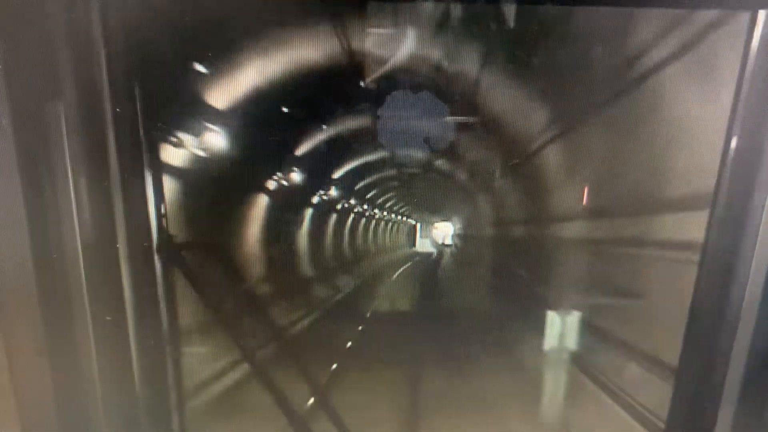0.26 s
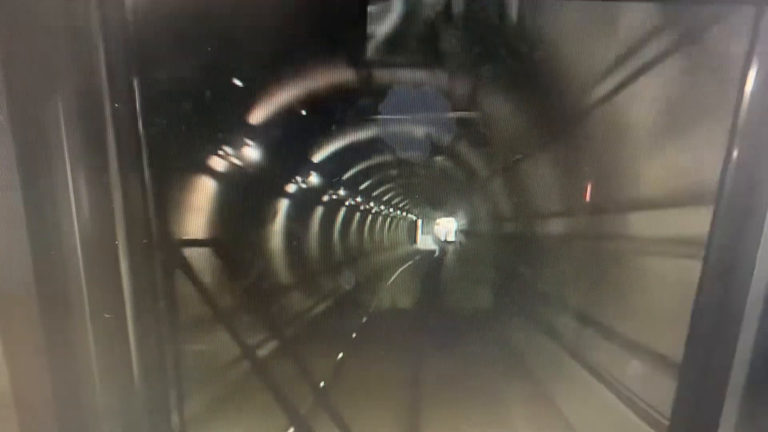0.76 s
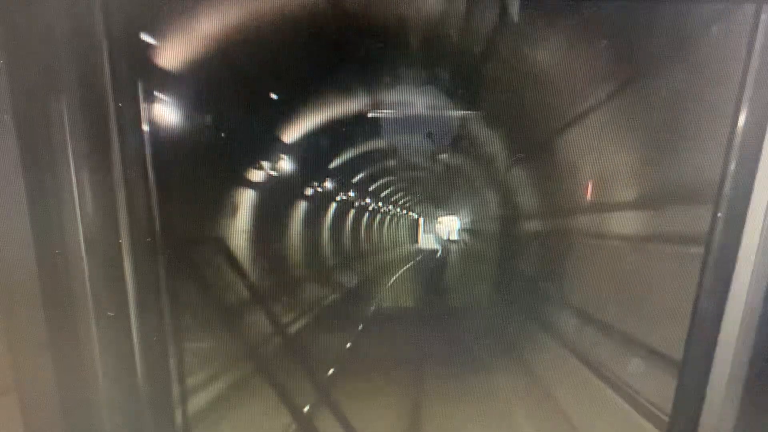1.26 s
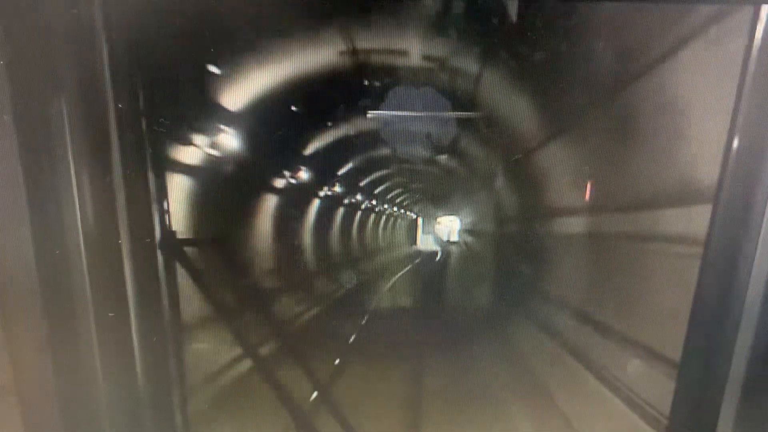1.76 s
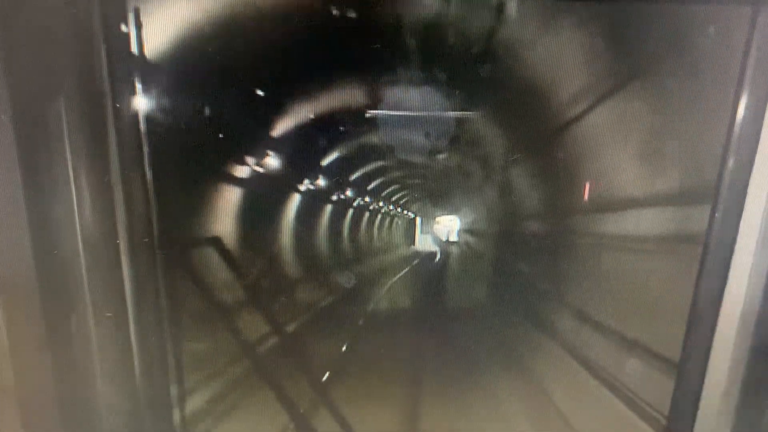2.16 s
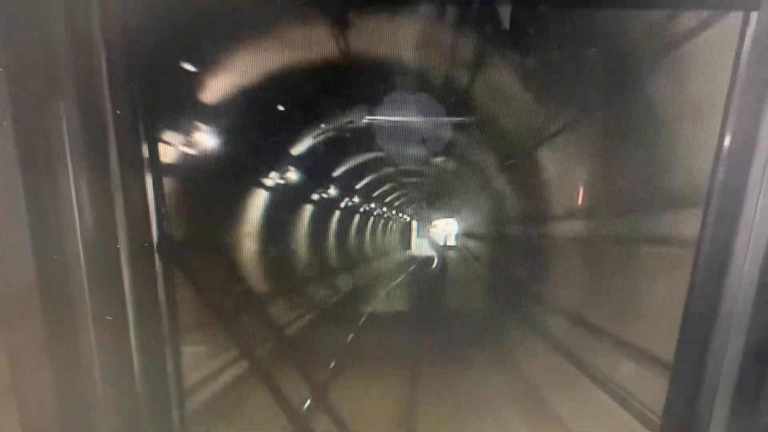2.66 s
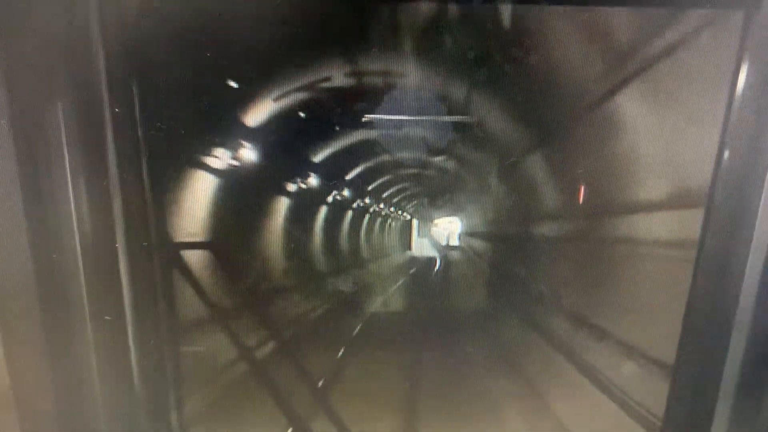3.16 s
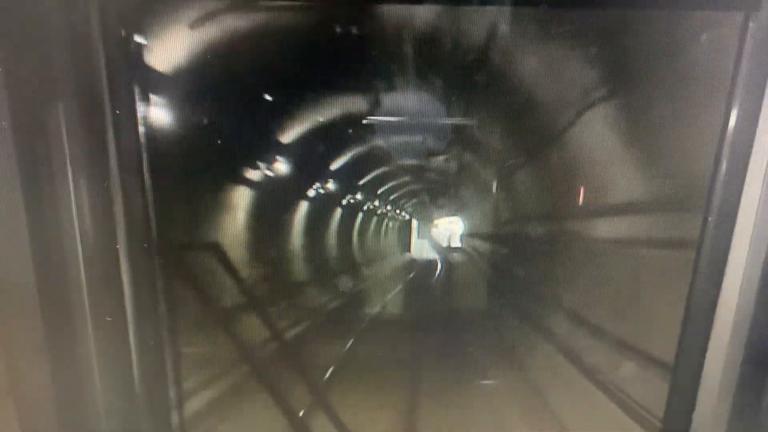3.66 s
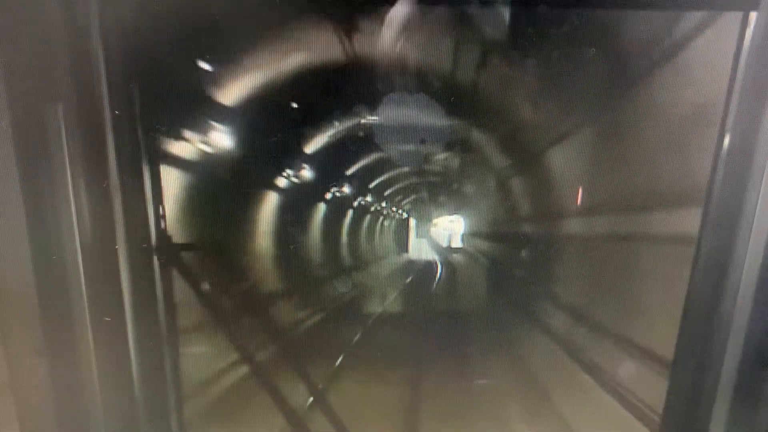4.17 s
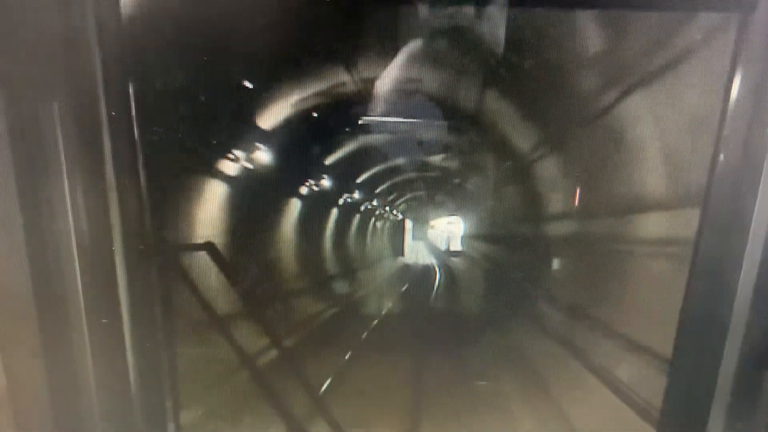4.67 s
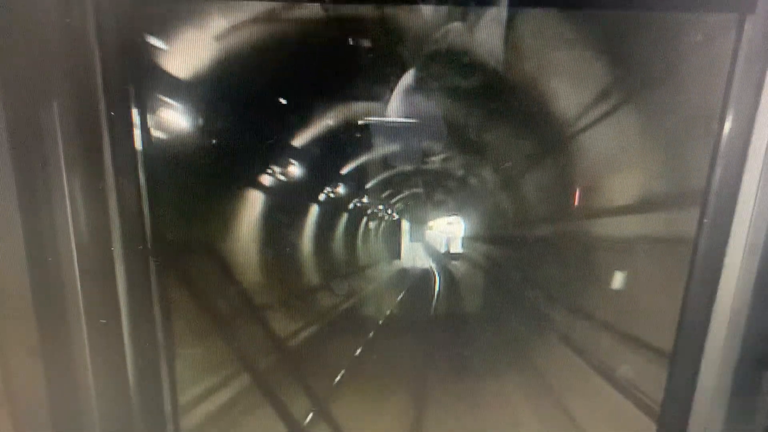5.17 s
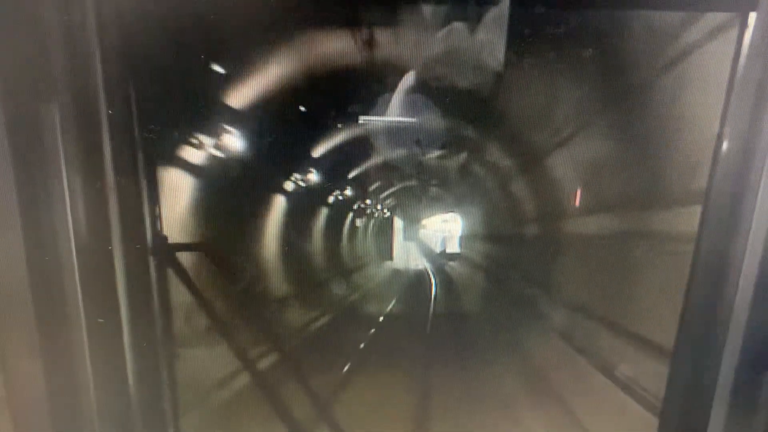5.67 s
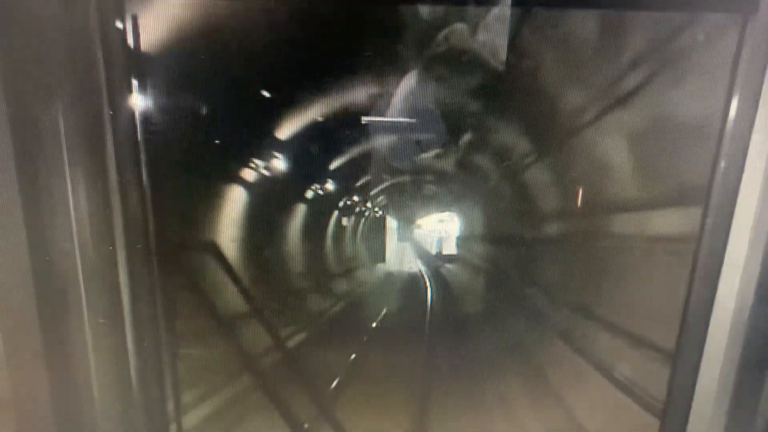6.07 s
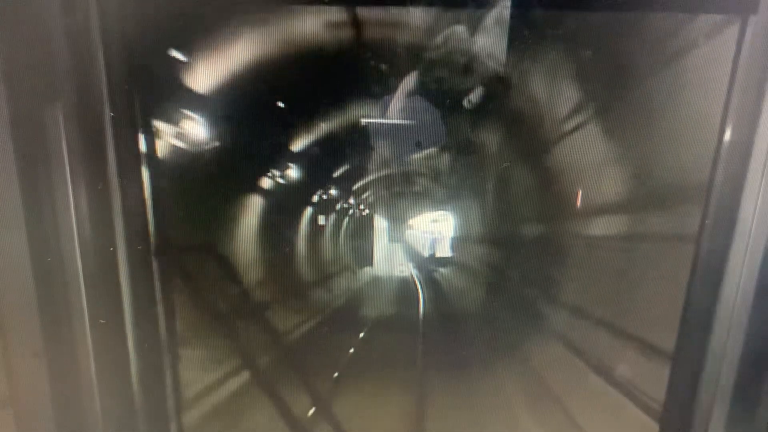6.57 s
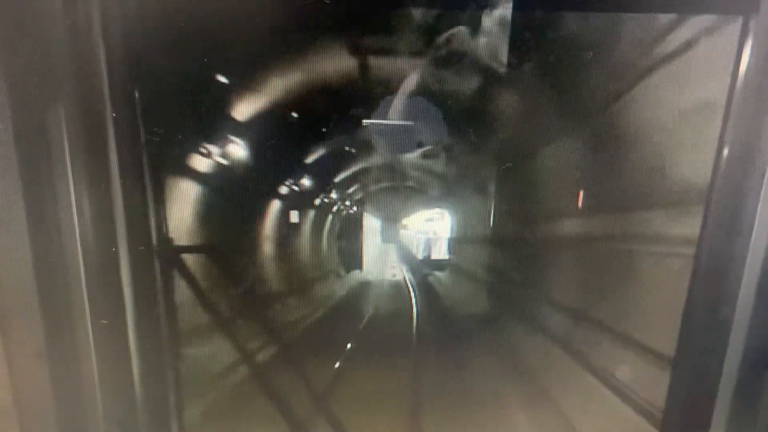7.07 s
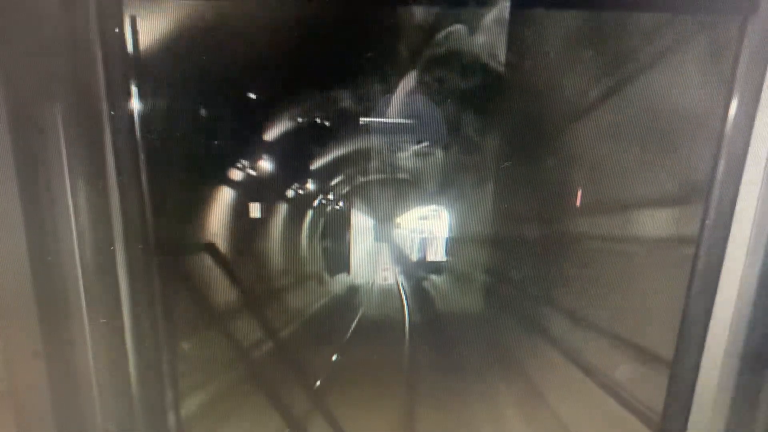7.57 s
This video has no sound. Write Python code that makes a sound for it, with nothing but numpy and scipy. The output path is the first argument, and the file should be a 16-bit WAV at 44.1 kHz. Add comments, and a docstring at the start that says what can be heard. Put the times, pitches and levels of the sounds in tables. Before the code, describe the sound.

Inside the front car of a moving electric train in a tunnel, close behind the window. From 0 s a deep, full rumble dominates, throbbing unevenly in short low pulses, while steel wheels give a softer, grainy, slightly ringing hiss. Steady ventilation air, a low duct drone and very faint whines lie beneath. Around 0.9-1.1 s the wheels ring a little brighter, with a soft thud; a barely audible rustle passes near 1.4 s. Muffled thuds come at 2.4 and 3.7 s. At 3.2 s a small hard part clicks sharply close by, right after quieter rumble. Near 4.3 s the rumble swells, then eases. From about 5.6 s the track turns rougher: strong booming throbs, peaking around 6 s, loose trim buzzing and knocking lightly, brief hoarse flange rubbing around 6, 6.6 and 7.3 s. It stays heavy and unsettled to the end, just before 8 s.

```python
"""An electric train runs through a concrete tunnel, heard by a phone behind the front window.
Rail roughness shakes the car's resonances, modelled as filtered noise, into a rumble. Wavy patches throb
at their own pitch, pitted stretches make wheels and rails ring louder, bumps thud, flanges rub, and the
last stretch is rougher all over. Ventilation is steady noise and faint tones; loose trim chatters in
surges of noise, something rustles faintly, and a small part clicks close by in noise bursts and pings."""
import sys
import numpy as np
from scipy import signal
from scipy.fft import rfft, irfft
from scipy.io import wavfile
from scipy.ndimage import uniform_filter1d, map_coordinates

SR = 44100
rng = np.random.default_rng(int(sys.argv[2]) if len(sys.argv) > 2 else 0)


def waveform_to_disk(signal):
    """Save audio, clipped to [-1, 1], as 16-bit WAV at the path in sys.argv[1]."""
    frames = np.transpose(np.atleast_2d(signal))
    scaled = np.clip(frames, -1, 1) * 32767
    samples = np.round(scaled).astype(np.int16)
    wavfile.write(sys.argv[1], SR, samples)


N = 345730
TIME = np.arange(N) / SR  # s
FREQ = np.maximum(np.arange(N // 2 + 1) * SR / N, 1e-3)  # Hz, kept above 0 for the logarithm
HALF_SIDE = np.array([[.5], [-.5]])  # left, right share of a port difference

# The phone's two ports in the cabin's sound field. Each row: frequency in Hz, left's phase lead in rad,
# coherence 0-1, left minus right in dB.
PORTS = [(45, 0.15, 0.99, 1.5), (100, 0.8, 0.99, 1.9), (144, 1.5, 0.99, 1.3), (187, 2, 0.99, 0.9),
         (235.6, 2.94, 0.92, -1.1), (308, 5.5, 0.85, 0.4), (330, 5.4, 0.93, -0.3), (407, 5.7, 1, 1.5),
         (470, 5.6, 1, -1.5), (545, 6.8, 0.74, -4.5), (780, 8.35, 0.77, 5.5), (1090, 7.73, 0.8, -0.3),
         (1340, 5.6, 0.6, -1.5), (1760, 3.2, 0.4, -0.6), (2020, 3.4, 0.4, -1.5), (2330, 6.5, 0.7, -0.2),
         (2970, 7.3, 0.1, -1.0), (4200, 5.6, 0.36, -1.6), (5940, 1.7, 0, 0.5)]


def undb(db):
    """Decibels to gain."""
    return 10 ** (np.asarray(db) / 20)


def curve(table, axis=1):
    """One column of a table of (s, ..) rows, joined by straight lines."""
    rows = np.array(table)
    return np.interp(TIME, rows[:, 0], rows[:, axis])


def colour(table, axis=1):
    """One column of a table of (Hz, ..) rows, joined on a log-frequency axis."""
    rows = np.array(table)
    return np.interp(np.log(FREQ), np.log(rows[:, 0]), rows[:, axis])


def colour_gain(table):
    """Gain of a spectrum given as (Hz, dB) points."""
    return undb(colour(table))


def resonances(modes):
    """Gain of steep-sided resonances (Hz, width Hz, dB) whose powers add."""
    power = 0
    for hz, width_hz, db in modes:
        detuning = (FREQ ** 2 - hz ** 2) / (FREQ * width_hz)
        power = power + (undb(db) / (1 + detuning ** 2)) ** 2
    return np.sqrt(power)


def white():
    """Spectrum of fresh noise at 0 dB per Hz."""
    return rfft(rng.standard_normal(N)) * np.sqrt(SR / 2)


def wander(size, count):
    """Random line of unit spread: count straight segments between random knots."""
    knots = rng.standard_normal(count + 1)
    line = np.interp(np.linspace(0, count, size), np.arange(count + 1), knots)
    return line / line.std()


def at_ports(gain):
    """Noise of a given colour at both ports: one shared wave with a phase lag, plus a diffuse part."""
    lead_rad = colour(PORTS, axis=1)
    shared = np.clip(colour(PORTS, axis=2), 0, 1)
    tilt_db = colour(PORTS, axis=3)
    wave = np.sqrt(shared) * white()
    ears = []
    for side in (1, -1):
        direct = wave * np.exp(.5j * side * lead_rad)
        diffuse = np.sqrt(1 - shared) * white()
        ears.append((direct + diffuse) * undb(side * tilt_db / 2))
    return irfft(np.array(ears) * gain, N)


def near_noise(gain):
    """Close source: noise of unit level and a given colour, independent at each port."""
    x = irfft(np.array([white(), white()]) * gain, N)
    return x / x.std()


def tone(hz, waver_hz, count):
    """A wavering tone of unit level, as it reaches the two ports."""
    phase = 2 * np.pi * np.cumsum(hz + waver_hz * wander(N, count)) / SR
    lead = np.interp(hz, FREQ, colour(PORTS, axis=1)) * HALF_SIDE
    return np.sqrt(2) * np.sin(phase + lead)


def steady(x, size):
    """Hold the slow level of the two ports' mean at 1 over size samples, leaving the fast beating."""
    return x / np.sqrt(uniform_filter1d(x.mean(axis=0) ** 2, size))


def wavering(x, spread, count):
    """Let the pitch of a stereo sound drift up and down by a small share."""
    drift = wander(N, count)
    place = np.arange(N) + spread * np.cumsum(drift - drift.mean())
    return np.array([map_coordinates(ear, [place], order=1, mode="mirror") for ear in x])


def swell(at_s, half_s):
    """Gaussian rise and fall, as when wheels run over a stretch of rail."""
    return np.exp(-((TIME - at_s) / half_s) ** 2)


def blows(events, t60_s):
    """Envelope of blows (s, dB) that each die away by 60 dB in t60_s."""
    return sum(undb(db - 60 * np.maximum(TIME - s, 0) / t60_s) * (TIME >= s) for s, db in events)


def standing_waves(depth_db):
    """Crowded upper cabin modes: a fixed fine spectral ripple, partly different at each port."""
    shared, left, right = (wander(len(FREQ), count=1500) for _ in range(3))
    ripple = undb(depth_db * (shared + .5 * np.array([left, right])))
    return ripple / np.sqrt(np.mean(ripple ** 2))


def shaking(db, follow, uneven_db):
    """Level in dB of a resonance: it follows the track's roughness and wavers by chance."""
    # Roughness, higher on a worn stretch. Each row: time in seconds, roughness in dB before follow.
    track_db = [(0, 1.5), (1.0, 1), (1.35, -1), (2.1, -0.5), (3.4, -1.5), (3.68, 0), (4.02, -1.5), (4.3, 6),
                (4.8, -3), (5.05, 2.5), (5.5, 2.5), (5.7, 5), (5.98, 10.5), (6.25, 7), (6.9, 7.5),
                (7.42, 6), (7.8, 7.5)]
    return db + follow * curve(track_db) + uneven_db * wander(N, count=50)


def shaken(modes, db):
    """Resonances driven by rail roughness to a given level."""
    return steady(at_ports(resonances(modes)), size=6500) * undb(db)


def rumble(roll_db):
    """Rail roughness drives six families of resonances; the windows also follow the rolling contact."""
    # Car body on its springs, floor, cabin air, roof, wall panels, windows.
    # Each row: frequency in Hz, width in Hz, relative level in dB.
    bounce_modes = [(57.3, 6.7, 2), (73, 4.5, -7)]
    floor_modes = [(112.7, 7.9, -9), (130.1, 9, 1.5), (146.1, 20, -6)]
    cabin_modes = [(166.3, 12, -2), (178.6, 9, -1), (190.8, 8.3, -1)]
    roof_modes = [(207.5, 12, 0.5), (238, 13, -7.5)]
    panel_modes = [(280, 24, 2.5), (304.7, 22, 0), (356, 22, -10), (398.7, 20, -9.5)]
    window_modes = [(462, 150, -3), (522.4, 39, -2), (560, 60, -2.5), (602, 13, -2)]
    # Mean levels of bounce and panels. Each row: time in seconds, level in dB.
    deep_db = [(0, -40), (.7, -42.5), (.85, -39.5), (1.4, -43.5), (2.6, -42), (3.4, -43), (3.95, -45),
               (4.4, -42.5), (5.1, -44), (6.0, -46), (7.0, -45.5), (7.8, -49.5)]
    panel_shake_db = [(0, -44.5), (.85, -43.5), (1.3, -46), (2.0, -44), (2.6, -45.5), (3.2, -46.5),
                      (4.3, -42), (4.7, -43.5), (5.3, -45.5), (5.8, -40), (6.2, -38), (6.6, -43),
                      (7.0, -44), (7.25, -42.5), (7.8, -45.5)]

    bounce = shaken(bounce_modes, curve(deep_db) + 1.0 * wander(N, count=90))
    floor = shaken(floor_modes, shaking(db=-33.0, follow=1.21, uneven_db=1.0))
    cabin = shaken(cabin_modes, shaking(db=-37.0, follow=1.25, uneven_db=1.5))
    roof = shaken(roof_modes, shaking(db=-46.0, follow=1.39, uneven_db=1.0))
    panels = shaken(panel_modes, curve(panel_shake_db) + 1.9 * wander(N, count=90))
    panels = wavering(panels, spread=.016, count=50)
    windows_db = shaking(db=-48.5, follow=0.41, uneven_db=1.5) + 1.2 * roll_db
    windows = wavering(shaken(window_modes, windows_db), spread=.02, count=70)
    windows = windows * undb(1.3 * wander(N, count=140) - .2)
    return bounce + floor + cabin + roof + panels + windows


def throbs(waver=0.017):
    """Each wavy patch of rail drives the car at one wavering pitch while the wheels cross it."""
    # Each row: middle in seconds, half length in seconds, throb level in dB, mean pitch in Hz.
    patches = [(.06, 0.02, -20, 124.2), (.17, .04, -24.5, 179), (.45, 0.06, -23.5, 136),
               (.48, 0.053, -24.5, 183.6), (.74, .06, -27.5, 137.7), (.85, 0.046, -38.5, 277),
               (.95, .25, -42, 240), (.99, 0.039, -23, 179.8), (1.03, 0.082, -30, 133.6),
               (1.07, .04, -29.5, 108), (1.32, .06, -32, 114.4), (1.67, 0.043, -42, 300.7),
               (1.80, .05, -28.5, 124.7), (1.745, .05, -25.5, 192.3), (2.12, .05, -35, 112),
               (2.40, .05, -28.5, 132.6), (2.65, 0.031, -21.5, 128.6), (2.78, .035, -28, 112),
               (2.85, 0.033, -25.5, 129.4), (2.92, .07, -40, 284), (3.0, 0.042, -23, 135.1),
               (3.04, 0.053, -26.5, 178.6), (3.05, 0.047, -32.5, 59), (3.27, .05, -31.5, 104.2),
               (3.35, 0.062, -37, 56), (3.58, 0.052, -28.5, 131.1), (3.68, 0.076, -26.5, 109.9),
               (3.70, 0.05, -22, 141.4), (3.752, .07, -40, 79.6), (3.76, 0.04, -36.5, 285.7),
               (3.90, 0.026, -26, 127.7), (3.96, 0.047, -26.5, 191.6), (4.22, 0.059, -26.5, 189.5),
               (4.27, 0.096, -41.5, 286.7), (4.35, 0.041, -24.5, 177.8), (4.39, .08, -23.5, 138.6),
               (4.48, 0.1, -39, 55.7), (4.96, 0.022, -23, 168.7), (5.05, .055, -23, 178.2),
               (5.08, 0.05, -24, 129.1), (5.225, 0.054, -22, 133.2), (5.29, 0.1, -38, 55.9),
               (5.32, .03, -25.5, 129.7), (5.42, 0.033, -24, 138.1), (5.63, 0.047, -14.5, 130),
               (5.735, .05, -14.5, 131.6), (5.82, 0.028, -17.5, 136), (5.84, 0.12, -26, 109.6),
               (5.927, .15, -39.5, 291.8), (5.96, 0.041, -19.5, 134.1), (6.06, .08, -20.5, 206.1),
               (6.11, 0.033, -17.5, 132.6), (6.2, .2, -44.5, 68.4), (6.28, 0.036, -18.5, 136.6),
               (6.37, .12, -36.5, 309), (6.5, 0.024, -19.5, 145.1), (6.69, 0.035, -16.5, 135.2),
               (6.72, 0.073, -20, 207), (6.95, .06, -19, 183.3), (7.09, 0.046, -19, 176.5),
               (7.2, 0.079, -20, 212), (7.33, 0.039, -21.5, 205.2), (7.5, 0.042, -18, 132.6),
               (7.63, 0.038, -22.5, 190.1), (7.71, .04, -23, 210.4), (7.81, .03, -17.5, 133.7)]
    out = np.zeros((2, N))
    lead_rad = colour(PORTS, axis=1)
    drift = 1 + waver * wander(N, count=260)
    start_turns = rng.random(len(patches))
    for (s, half_s, db, hz), start in zip(patches, start_turns):
        near = np.abs(TIME - s) < 3 * half_s
        phase = 2 * np.pi * (start + np.cumsum(hz * drift[near]) / SR)
        lead = np.interp(hz, FREQ, lead_rad) * HALF_SIDE
        envelope = undb(db) * np.exp(-((TIME[near] - s) / half_s) ** 2)
        out[:, near] += np.sqrt(2) * np.sin(phase + lead) * envelope
    return out


def rolling():
    """Drive of the rolling contact in dB, raised on pitted rail."""
    # Between pitted stretches. Each row: time in seconds, drive in dB.
    rolling_db = [(0, -3), (2.6, -2.5), (4.9, -3.5), (5.45, -4), (5.7, -1.25), (6.25, -1.54), (7.0, -2.5),
                  (7.48, -2), (7.66, -5), (7.8, -2.5)]
    # Pitted stretches. Each row: middle in seconds, half length in seconds, extra drive in dB.
    pitted = [(0.895, 0.19, 1.5), (1.082, 0.072, 1.5), (1.598, 0.18, 0.4), (3.666, 0.12, 2),
              (6.002, 0.18, 0.5), (6.678, 0.13, 0.7), (7.248, 0.14, 1)]
    return curve(rolling_db) + sum(extra_db * swell(s, half_s) for s, half_s, extra_db in pitted)


def flickering(x, edges_hz=(1500, 1900, 2400, 3000, 3600, 4300, 5500)):
    """Each band of a noise flickers on its own; grit on the rail makes all of them grainy."""
    spectrum = rfft(x)
    band = np.searchsorted(edges_hz, FREQ)
    grit = undb(1.8 * wander(N, count=2400) - .2)
    total = 0
    for k in range(len(edges_hz) + 1):
        flicker = undb(2.0 * wander(N, count=170) - .5)
        total = total + irfft(spectrum * (band == k), N) * flicker
    return grit * total


def wheels(ripple, roll_db):
    """Steel rolls on steel: wheel and rail modes ring over a hiss, and the contact force flutters."""
    # Wheels and rails. Each row: frequency in Hz, width in Hz, relative level in dB.
    wheel_modes = [(719, 30, -1.5), (790, 50, -5), (896.6, 40, 3.5), (946, 22, 2), (1070, 22, -5),
                   (1180, 33, -4), (1289.6, 23, 0), (1349, 62, -.5), (1416, 90, -1.5), (1575, 170, -7.5),
                   (1703, 35, .5), (1765, 50, -2.5), (1890, 130, -7.5), (2300, 230, -12), (3350, 360, -17),
                   (3807, 32, -10), (3900, 90, -14), (4140, 110, -18.5), (4250, 22, -15)]
    # Broad rolling noise. Each row: frequency in Hz, density in dB per Hz at 0 dB drive.
    roll_hiss = [(300, -90.5), (700, -80.5), (1100, -80), (1600, -85.5), (2100, -85.5), (3200, -91),
                 (4300, -94), (5000, -101), (6200, -106), (7500, -117), (11000, -116), (15000, -130)]
    ring = 0
    for first in range(4):
        # the contact patch wanders across the tread: each group of modes varies on its own
        favour_db = 2.2 * wander(N, count=100)
        group = at_ports(resonances(wheel_modes[first::4]) * undb(-75.0))
        ring = ring + group * undb(favour_db)
    ring = wavering(ring, spread=.003, count=60)
    hiss = flickering(at_ports(colour_gain(roll_hiss) * ripple))
    flutter_db = 0.7 * wander(N, count=190)
    return ring * undb(1.21 * roll_db + flutter_db) + hiss * undb(2.67 * roll_db + flutter_db)


def ventilation(ripple):
    """Steady air and drone from the ducts, with faint wavering tones of fans and converters."""
    # Air. Each row: frequency in Hz, density in dB per Hz.
    vent_air = [(20, -87.5), (200, -79), (700, -85.5), (1100, -99), (1600, -89), (2300, -90.5), (2700, -93),
                (3300, -96.5), (4100, -102), (4800, -105), (6200, -111), (7500, -120), (11000, -121),
                (15000, -134)]
    # Duct drone. Each row: frequency in Hz, width in Hz, density in dB per Hz.
    duct_modes = [(94, 7.9, -65.5), (97.8, 11, -53), (105, 22, -51.5)]
    # Fans and converters. Each row: mean frequency in Hz, mean level in dB.
    whine_tones = [(407, -54), (1350, -76.5), (1703, -78), (2343, -78.5), (2396, -75), (3584, -85),
                   (3779, -84.5), (4138, -86)]
    air = at_ports(np.hypot(colour_gain(vent_air) * ripple, resonances(duct_modes)))
    whine = 0
    for hz, db in whine_tones:
        level = undb(db + 1.4 * wander(N, count=50))
        whine = whine + tone(hz, waver_hz=3.5, count=150) * level
    return air + whine


def trim():
    """Loose trim buzzes in surges, as chattering noise, with a few harder knocks."""
    # Knocks. Each row: time in seconds, onset level in dB.
    knocks = [(5.89, -65), (6.04, -69), (6.493, -62), (7.175, -69), (7.29, -66)]
    # Buzz. Each row: time in seconds, mean level in dB.
    buzz_db = [(0, -80), (3.4, -80), (3.7, -73.5), (3.9, -81), (4.3, -73), (4.8, -81), (5.15, -74),
               (5.5, -74), (5.7, -68), (6.05, -65), (6.3, -68), (6.42, -73), (6.62, -73), (6.72, -66.5),
               (6.88, -67), (7.0, -73), (7.2, -68), (7.45, -73), (7.8, -71)]
    # Colour. Each row: frequency in Hz, relative level in dB.
    trim_colour = [(1500, -12), (3500, 2), (4500, 7), (6300, 3), (8500, -10), (10800, -2.5), (13000, -14),
                   (15500, -20)]
    chatter = undb(2.2 * wander(N, count=3000))
    bouts = blows(knocks, t60_s=.22)
    buzz = undb(curve(buzz_db) + 1.3 * wander(N, count=220))
    return near_noise(colour_gain(trim_colour)) * chatter * np.hypot(bouts, buzz)


def bumps():
    """Wheel hits on rough spots, softened by the springs, thud in the windows and wall panels."""
    # Each row: time in seconds, onset level in dB before softening.
    rough_spots = [(1.07, -41.5), (2.355, -35), (3.66, -39.5)]
    # Each row: frequency in Hz, width in Hz, relative level in dB.
    bump_modes = [(410, 22, 0), (476, 100, -9.5), (576, 33, 0)]
    push = uniform_filter1d(blows(rough_spots, t60_s=.3), size=700)
    return steady(at_ports(resonances(bump_modes)), size=3000) * push


def flanges():
    """Now and then a wheel flange rubs the rail and sings hoarsely, catching and letting go."""
    # Each row: middle in seconds, half length in seconds, level in dB before the grip's variation.
    rubs = [(1.1, .05, -56.5), (3.592, 0.18, -58), (5.98, 0.06, -52), (6.55, 0.09, -55), (6.775, 0.15, -56),
            (7.27, 0.12, -57), (7.44, 0.027, -50)]
    # The rubbed wheel. Each row: frequency in Hz, width in Hz, relative level in dB.
    rub_modes = [(1220, 62, -2.5), (1350, 50, 5.5), (1530, 120, -6)]
    song = wavering(at_ports(resonances(rub_modes)), spread=.014, count=110)
    grip = undb(3 * wander(N, count=170) - 1)
    contact = sum(undb(db) * swell(s, half_s) for s, half_s, db in rubs)
    return steady(song, size=8000) * grip * contact


def rustle(at_s=1.44, half_s=0.32, db=-76.0):
    """A faint, high, grainy rustle close to the phone: noise with fast random level changes."""
    gain = resonances([(6300, 1500, -1), (10900, 2600, 0)])
    return near_noise(gain) * swell(at_s, half_s) * undb(db + 2.2 * wander(N, count=1200))


def click(body_db=-7.5, tail_db=-35.0, pan_db=2.5):
    """A hard little part snaps in quick contacts; its lowest modes ping and the cabin answers briefly."""
    # Contacts. Each row: time in seconds, onset level in dB before body_db or tail_db.
    contacts = [(3.1801, -34), (3.1816, -29.5), (3.1845, -44), (3.1968, -49), (3.2175, -53)]
    # Ring. Each row: frequency in Hz, width in Hz, relative level in dB.
    click_modes = [(5600, 700, 5.5), (6400, 750, 5.5), (9400, 700, -8), (10200, 650, 4),
                   (11900, 1300, -1.5), (15200, 1400, -3.5)]
    # Pings. Each row: frequency in Hz, 60 dB decay in seconds, level in dB re the first contact.
    click_pings = [(2659, .045, -14), (2815, .04, -15)]
    snap = blows(contacts, t60_s=.011) * undb(body_db)
    tail = blows(contacts, t60_s=.19) * undb(tail_db)
    ring = near_noise(resonances(click_modes)) * np.hypot(snap, tail) * undb(pan_db * HALF_SIDE)
    ping = 0
    for hz, t60_s, db in click_pings:
        ping = ping + np.sin(2 * np.pi * hz * TIME) * blows(contacts[:1], t60_s) * undb(db)
    return ring + ping


def scene():
    """Everything heard in the front car."""
    ripple = standing_waves(depth_db=2.3)
    roll_db = rolling()
    track = rumble(roll_db) + throbs() + wheels(ripple, roll_db) + bumps() + flanges()
    return track + ventilation(ripple) + trim() + rustle() + click()


def record(dry):
    """The phone cuts the top: a steep elliptic low-pass at 15.7 kHz."""
    low_pass = signal.ellip(8, .2, 70, 15700, fs=SR, output="sos")
    return signal.sosfilt(low_pass, dry)


dry = scene()
out = record(dry)
waveform_to_disk(out)
```